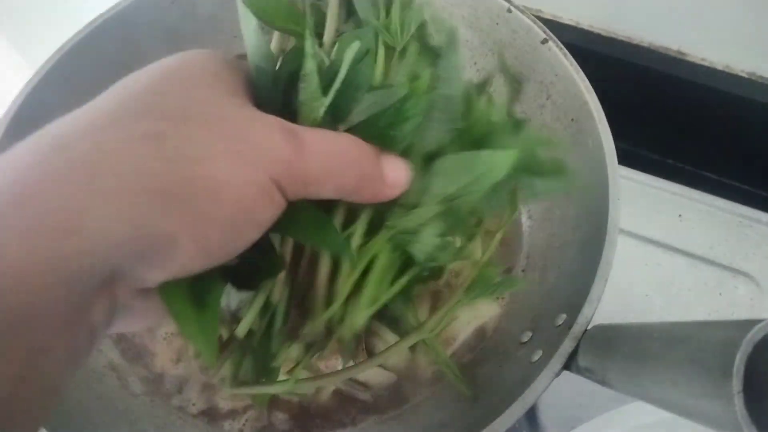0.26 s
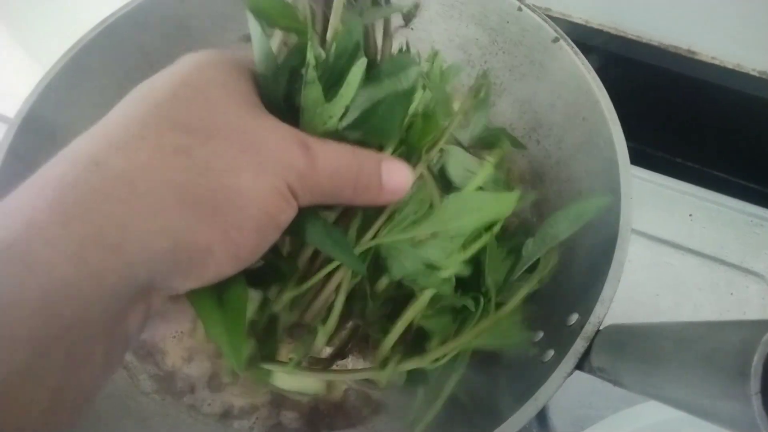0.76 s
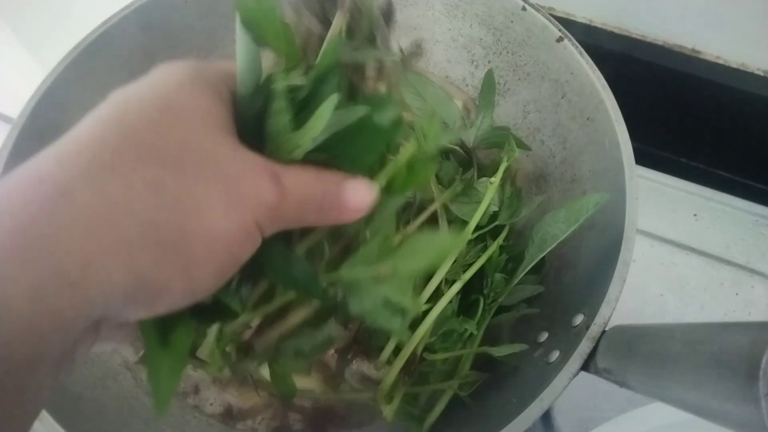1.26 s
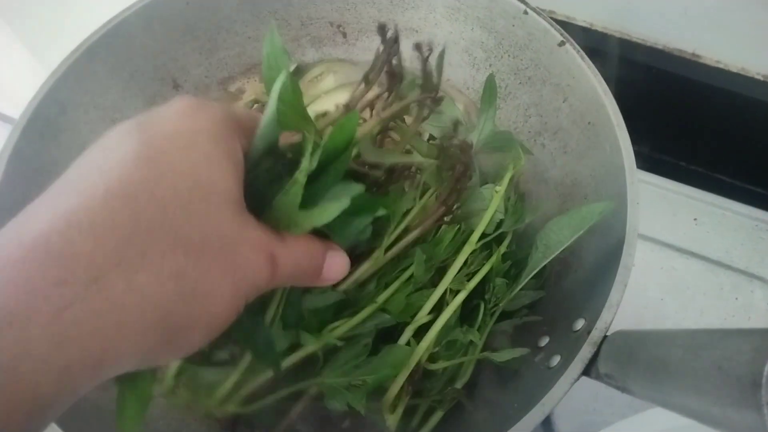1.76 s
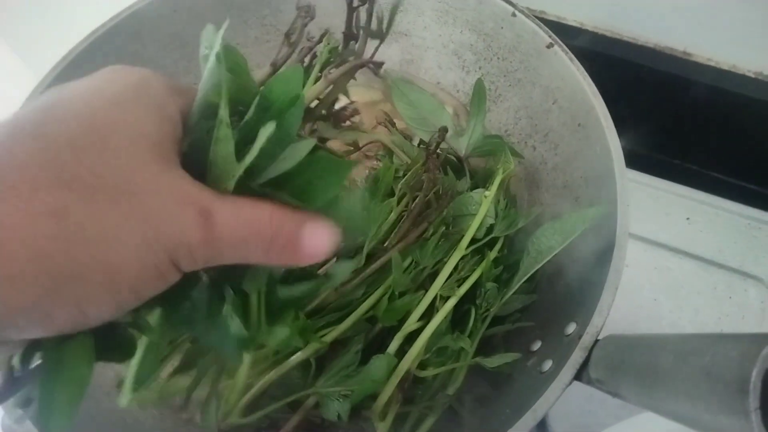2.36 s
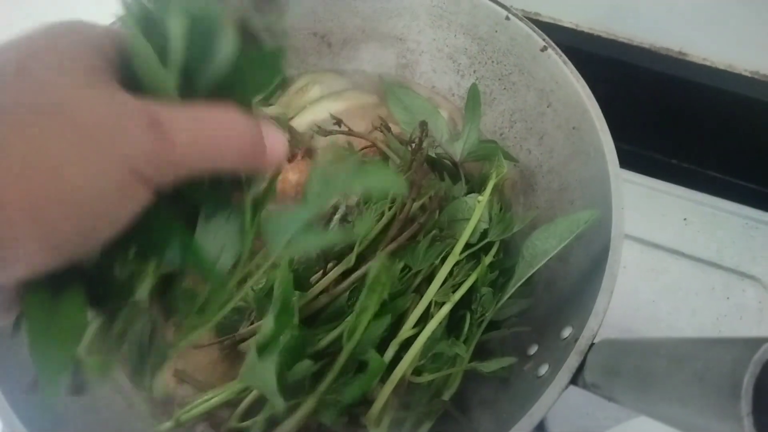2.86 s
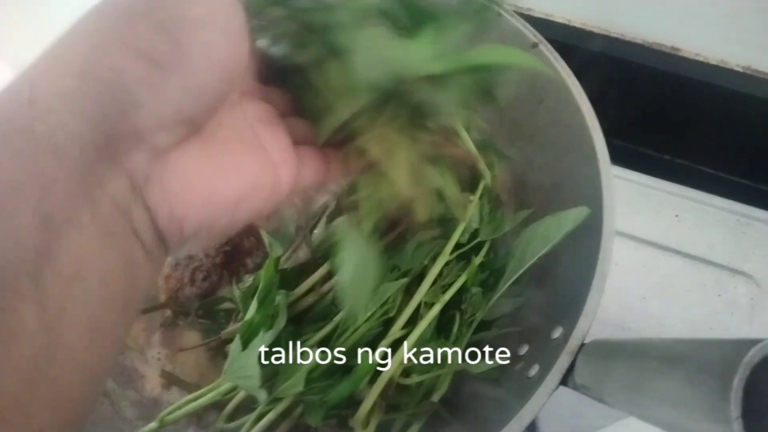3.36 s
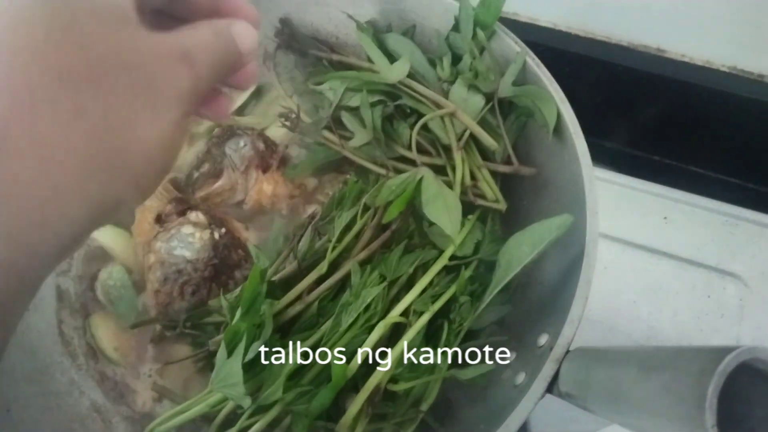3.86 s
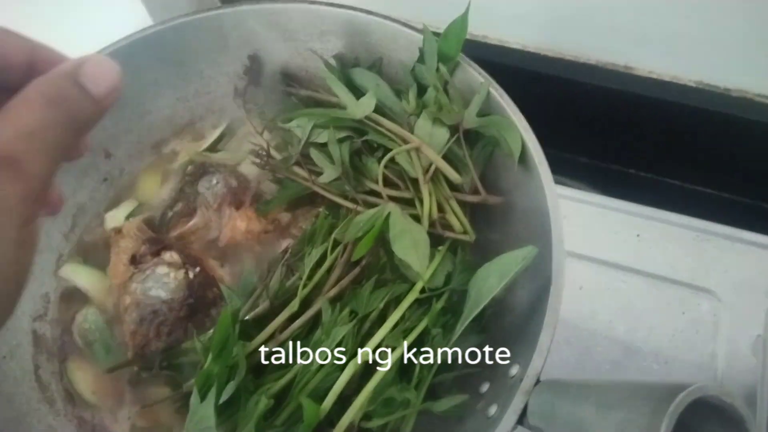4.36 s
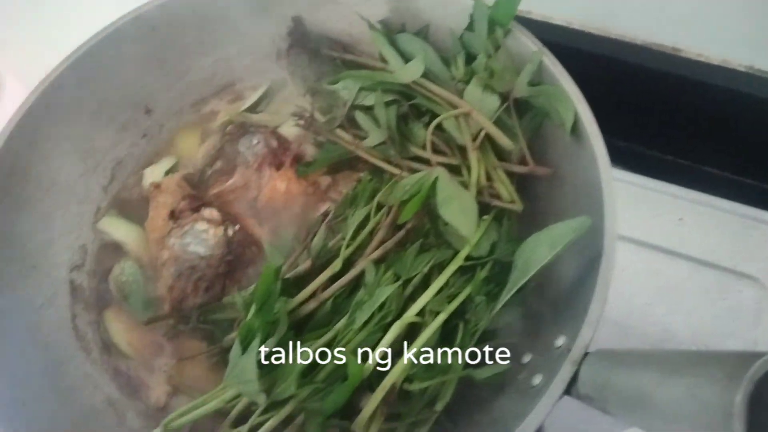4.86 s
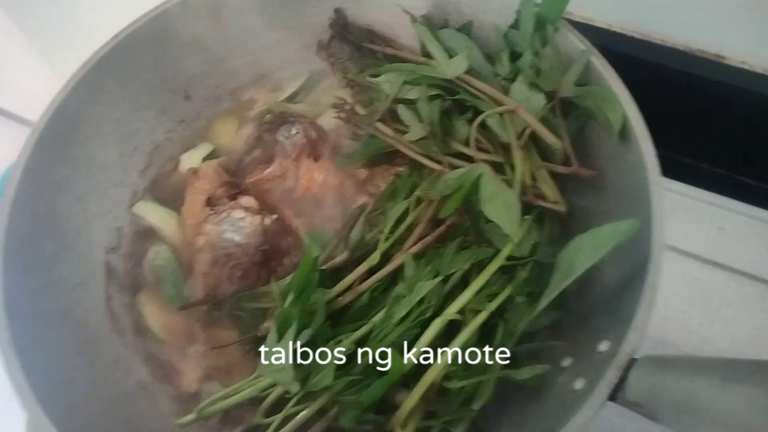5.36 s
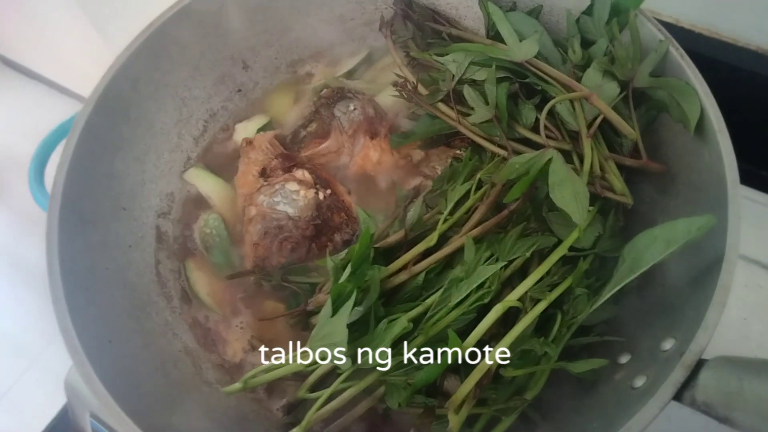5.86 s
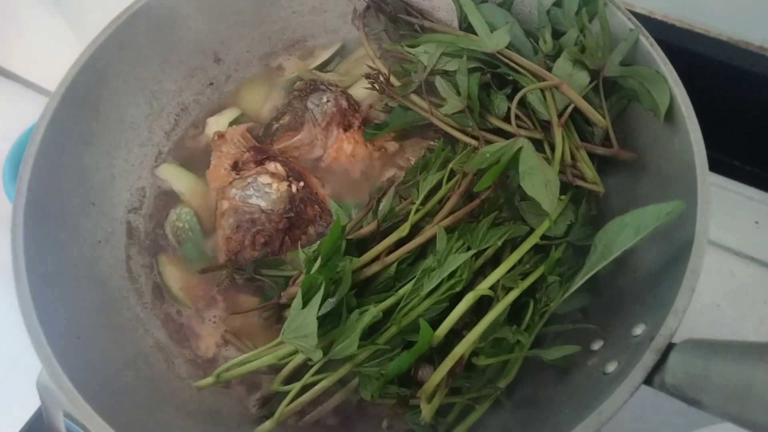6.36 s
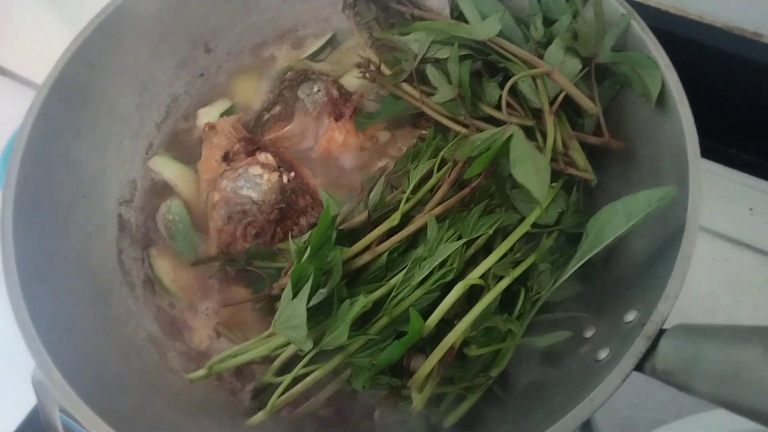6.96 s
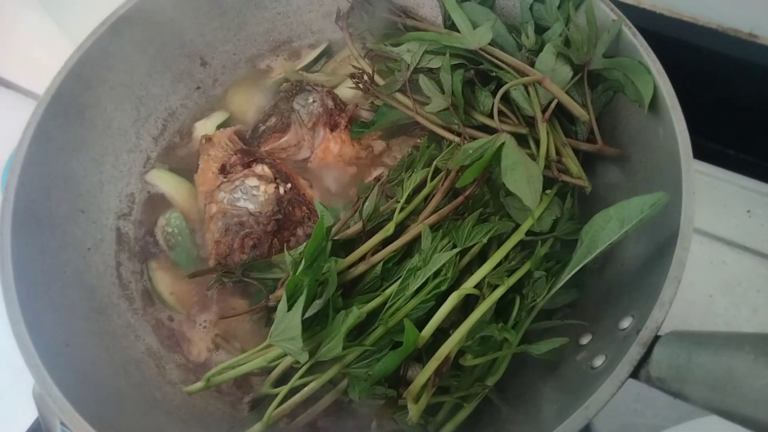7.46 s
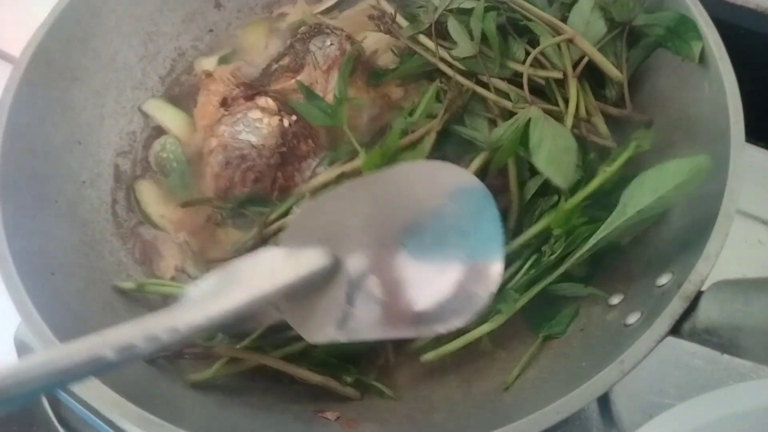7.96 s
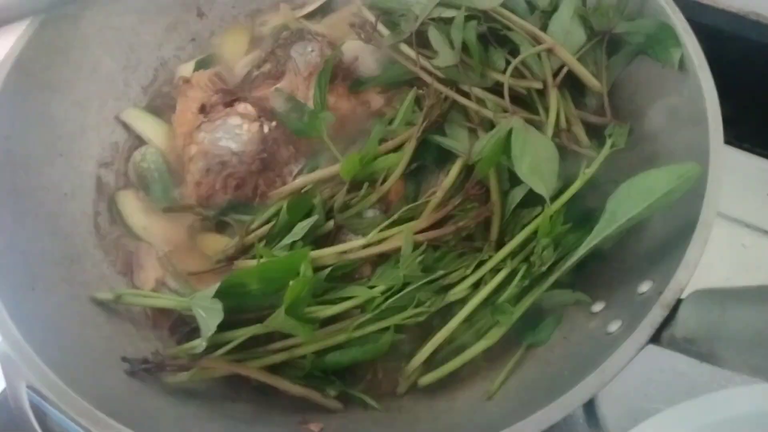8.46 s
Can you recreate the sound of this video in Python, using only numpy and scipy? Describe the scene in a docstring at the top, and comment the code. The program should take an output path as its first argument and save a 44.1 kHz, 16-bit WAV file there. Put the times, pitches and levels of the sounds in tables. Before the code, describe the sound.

From 0 s a vigorous broth boil is already running in a metal wok, close and fairly dry, with short bowl reflections and a little small-kitchen reverberation. Irregular hollow plops rise in pitch, some bright and ringing, over dense small bubbling, fine crackling fizz, a soft metallic hum and a quiet low rumble. Dry ticks and brief spits of drops on hot metal punctuate it. Around 2.6 to 2.9 s the boil eases slightly; near 3.3 s greens settle with a short rustle and airy hiss. Very faint steam whistles follow at 3.4 and 4 s. Spitting becomes busier from 4.5 s, strongest near 5.3 and 6.2 s, with faint dull bumps from 6.2 to 6.9 s. From about 6.9 s a narrow, high sizzle swells until everything stops abruptly at 7.34 s. Total silence lasts until 7.87 s, then bubbling resumes suddenly, with a soft low thud at 8.3 s, ending mid-boil around 8.7 s.

```python
"""Big bubbles pop at once, over a bed of small ones and a fine fizz: broth boils in a metal wok over a gas flame.
Bubbles are decaying sines of rising pitch; fizz, spits, sizzle and leaves are shaped clicks or noise bursts.
Drops spit on the hot wall, leafy greens are laid in, and resonators make the wok hum along with the boil.
A sizzle swells, the sound breaks off for half a second, and the boil goes on as a spatula presses the greens."""
import sys
import numpy as np
from scipy import signal
from scipy.fft import rfft, irfft
from scipy.io import wavfile

SR = 44100
rng = np.random.default_rng(int(sys.argv[2]) if len(sys.argv) > 2 else 0)


def to_wav(s):
    """Save 16-bit WAV."""
    ch = np.atleast_2d(s).T  # columns
    pcm = np.round(np.clip(ch, -1, 1) * 32767)  # PCM
    wavfile.write(sys.argv[1], SR, pcm.astype(np.int16))


N = 384111
TIME = np.arange(N) / SR

# All levels are relative: each layer's gain and the microphone response come on top.
# biggest bubbles bursting: start_s, level_db, pitch_hz (at onset), decay_cycles (to fade by 60 dB)
BIG_BUBBLES = [(0.008, -34, 1070, 8), (0.0366, -24, 1090, 5), (0.0439, -25.5, 2090, 7),
               (0.0992, -26, 1533, 16.5), (0.118, -31, 1440, 11), (0.182, -28, 1440, 31),
               (0.249, -32, 1260, 7), (0.2607, -22, 1326, 4), (0.2626, -26, 1280, 1), (0.272, -26, 1380, 8),
               (0.2815, -24, 1620, 7), (0.2907, -24.5, 1633, 26), (0.2928, -27, 1140, 3.5),
               (0.3228, -28, 1700, 5), (0.371, -30, 1860, 8), (0.38, -34, 1110, 7),
               (0.4551, -27.5, 1220, 3), (0.472, -31.5, 1290, 14), (0.6319, -31.5, 900, 7),
               (0.652, -32, 865, 19), (0.677, -36, 1300, 7), (0.7449, -29, 856, 13.5),
               (0.777, -33, 1180, 8), (0.804, -34, 890, 8), (0.8253, -22.5, 1480, 13),
               (0.8725, -28.5, 779, 12), (0.901, -29, 1530, 7), (0.9167, -26, 2830, 26.5),
               (0.9405, -30, 1130, 15), (0.9751, -31, 1180, 7), (1.002, -25, 1560, 18),
               (1.0414, -25, 2600, 7), (1.0655, -35, 933, 31), (1.0838, -26, 1335, 4),
               (1.094, -32, 2935, 28), (1.104, -35, 1320, 7), (1.1452, -30, 1010, 5),
               (1.1524, -35, 898, 12), (1.1647, -28, 2820, 25), (1.17, -33, 1040, 10),
               (1.2043, -32.5, 970, 7), (1.2155, -28, 743, 5), (1.235, -30.5, 1560, 14),
               (1.28, -32, 900, 8), (1.3062, -26, 1557, 15), (1.376, -32.5, 920, 5), (1.414, -32, 1180, 8),
               (1.424, -27.5, 1327, 4), (1.442, -34, 1530, 8), (1.508, -31.5, 1220, 8),
               (1.659, -32, 1620, 8), (1.711, -34, 1050, 6), (1.738, -33, 1290, 7), (1.762, -32.5, 880, 16),
               (1.7705, -32.5, 827, 22), (1.8182, -24.5, 1872, 31), (1.8189, -29.5, 2320, 6.5),
               (1.8185, -19, 2530, 4.5), (1.8433, -23.5, 1900, 6.5), (1.8447, -23, 2056, 6),
               (1.8511, -23.5, 2813, 20), (1.892, -33, 850, 7), (1.911, -27.5, 1380, 5),
               (1.9849, -29.5, 884, 9), (1.9985, -30.5, 1285, 6), (2.0198, -26, 1242, 2),
               (2.058, -30, 1780, 12), (2.148, -34, 1530, 2), (2.191, -32, 1000, 5),
               (2.1976, -29.5, 1125, 5), (2.2178, -31.5, 1450, 6), (2.2609, -30, 2500, 9),
               (2.3039, -26.5, 1087, 17), (2.3192, -29, 1400, 4), (2.323, -24, 1317, 6),
               (2.4871, -29, 900, 11), (2.496, -33, 980, 4), (2.6076, -32, 860, 12), (2.797, -32, 1700, 5),
               (2.8279, -25, 1500, 13), (2.8405, -28, 1590, 14), (2.881, -33, 1200, 6),
               (2.9535, -23, 1052, 10), (3.0062, -27, 1560, 5), (3.0607, -26, 2690, 15),
               (3.0675, -20, 3800, 14.5), (3.107, -32, 940, 7), (3.134, -32, 1250, 7),
               (3.15, -27.5, 1313, 7.5), (3.1919, -22, 1560, 3.5), (3.2282, -25, 2800, 19),
               (3.2483, -25, 970, 3.5), (3.2652, -24.5, 1090, 8.5), (3.2676, -23.5, 2710, 16),
               (3.2741, -25, 2614, 28), (3.3338, -30.5, 821, 11), (3.373, -32, 1000, 3),
               (3.384, -34.5, 770, 9), (3.446, -33, 1260, 7.5), (3.502, -34, 940, 7),
               (3.6139, -23.5, 1763, 23), (3.6234, -21, 3280, 6.5), (3.702, -32.5, 1520, 7),
               (3.751, -30.5, 1340, 8), (3.7661, -24, 2585, 26), (3.769, -29, 2630, 25.5),
               (3.8911, -17, 1433, 3.5), (3.8938, -30.5, 1620, 1.5), (3.8987, -26.5, 3000, 20),
               (3.9072, -28, 1450, 6), (3.925, -32, 990, 8), (4.0096, -28.5, 1502, 20),
               (4.0426, -33.5, 706, 15.5), (4.058, -34, 920, 3), (4.0921, -27.5, 903, 13),
               (4.22, -31.5, 1300, 11), (4.3452, -28, 1970, 20), (4.385, -31, 880, 8),
               (4.4355, -29, 1050, 5), (4.4529, -25, 2390, 6), (4.4565, -25, 1555, 1), (4.516, -31, 950, 8),
               (4.5293, -26.5, 1015, 3.5), (4.5501, -27.5, 1330, 5.5), (4.5815, -26.5, 3290, 8),
               (4.6549, -38, 803, 24.5), (4.6571, -25.5, 3410, 3), (4.6647, -31, 832, 12),
               (4.69, -23.5, 2710, 17.5), (4.7726, -18, 2815, 16), (4.7735, -28, 734, 5),
               (4.8858, -17, 2660, 5), (4.9337, -26, 2700, 18), (4.9557, -25.5, 1230, 9),
               (4.9782, -31, 900, 23), (5.013, -25.5, 2220, 7.5), (5.069, -31, 770, 7),
               (5.082, -30, 1100, 5), (5.0939, -27.5, 2630, 29), (5.2649, -30.5, 830, 9),
               (5.2745, -27.5, 3420, 0.5), (5.276, -23, 3260, 3.5), (5.2829, -22, 1310, 4.5),
               (5.2965, -29.5, 1160, 6), (5.371, -31, 1050, 9), (5.395, -30.5, 1140, 7),
               (5.4214, -27, 964, 12), (5.4606, -23, 2500, 3.5), (5.5211, -27.5, 780, 7.5),
               (5.5676, -27.5, 2930, 17), (5.638, -31, 1510, 8), (5.652, -33, 1410, 7),
               (5.697, -22.5, 975, 4), (5.7152, -25.5, 1590, 7), (5.7156, -27.5, 2700, 24),
               (5.725, -31, 1840, 10), (5.7494, -26, 2210, 4), (5.7724, -23, 2710, 16),
               (5.779, -19.5, 1334, 2.5), (5.817, -34, 1010, 7), (5.8332, -28, 1132, 27),
               (5.9364, -34, 2040, 27), (5.943, -32, 1900, 10), (5.9702, -24, 898, 7),
               (6.028, -32, 1070, 7), (6.042, -29.5, 1740, 10.5), (6.085, -32.5, 1150, 7),
               (6.1, -26, 940, 0.5), (6.1054, -29.5, 970, 3.5), (6.1219, -28.5, 1094, 10),
               (6.2011, -25.5, 2680, 12), (6.2099, -24.5, 970, 2), (6.2361, -24.5, 2800, 21),
               (6.2432, -27, 900, 5), (6.271, -27, 1280, 4.5), (6.3206, -23, 900, 8),
               (6.324, -22.5, 1607, 28), (6.3553, -25, 1330, 5), (6.3712, -22.5, 1675, 10),
               (6.4179, -30.5, 899, 10), (6.4959, -30.5, 895, 13), (6.5181, -22.5, 1500, 5),
               (6.5241, -27, 1740, 18), (6.57, -24, 1450, 1.5), (6.589, -24, 968, 4.5),
               (6.6577, -30.5, 977, 9), (6.689, -32, 1190, 9), (6.704, -32, 1250, 7),
               (6.714, -34, 1190, 11), (6.7721, -30.5, 1056, 5.5), (6.8318, -24.5, 1125, 6.5),
               (6.8533, -26, 1170, 5), (6.8683, -23.5, 1500, 4), (6.8751, -28, 2710, 26),
               (6.9007, -26.5, 1046, 4.5), (6.905, -25, 1096, 4.5), (6.913, -29, 1400, 9),
               (6.9334, -24.5, 1136, 5.5), (7.0106, -20.5, 936, 10), (7.0254, -29.5, 1807, 27),
               (7.0738, -24, 1323, 9.5), (7.091, -32, 1540, 7), (7.1059, -23, 1200, 6),
               (7.1937, -28.5, 1050, 3.5), (7.2123, -25.5, 1380, 9), (7.225, -29.5, 1680, 9),
               (7.2466, -23, 2802, 17.5), (7.25, -27.5, 2800, 28.5), (7.278, -27.5, 1390, 8),
               (7.3137, -29, 1180, 13), (7.883, -25.5, 790, 3), (7.8887, -21.5, 1063, 4),
               (7.932, -31, 960, 8), (7.9572, -30.5, 920, 21), (7.9627, -34, 860, 17.5),
               (7.988, -27, 1500, 3.5), (8.0227, -29, 1230, 4), (8.0586, -24, 1660, 6),
               (8.0616, -22, 1546, 1), (8.0631, -18, 1553, 17), (8.076, -31, 1550, 11),
               (8.1285, -25, 1323, 16), (8.1458, -27, 1230, 11.5), (8.1626, -29.5, 1273, 7.5),
               (8.2026, -27, 933, 5), (8.301, -31, 900, 12), (8.3504, -27.5, 1614, 7), (8.392, -32, 810, 9),
               (8.401, -35, 1150, 4), (8.442, -24.5, 2150, 12), (8.542, -30, 1740, 10), (8.62, -34, 960, 5)]
# vigour of the boil: time_s, level_db
BOIL_VIGOUR = [(0.0, -40), (0.43, -42.5), (1.03, -41), (1.5, -42.5), (2.43, -41.5), (2.59, -44),
               (2.83, -45), (3.22, -42), (3.68, -43.5), (4.37, -42), (5.97, -42), (7.1, -41.5), (8.0, -42),
               (8.042, -42), (8.7, -42.5)]
# spectrum of the fizz: frequency_hz, level_db
FIZZ_SPECTRUM = [(300, -18), (520, -5), (650, 5), (950, 1), (1600, 2), (2300, 1), (2900, 1), (4500, 3),
                 (6500, -2.5), (9000, -5), (15000, -5)]
# sharp, dry ticks among the stems and the broth: start_s, level_db
STEM_TICKS = [(0.019, -23), (0.322, -38), (0.397, -21.5), (0.901, -27), (0.976, -30), (1.0414, -24),
              (1.205, -24), (1.821, -28), (1.8517, -26), (2.02, -27), (2.148, -26), (2.2602, -22),
              (3.005, -20.5), (3.0605, -22), (3.118, -24), (3.15, -31.5), (3.192, -23), (3.228, -31.5),
              (3.249, -31), (3.276, -31), (3.333, -29.5), (5.772, -22), (6.199, -23.5), (6.869, -23),
              (7.986, -26.5), (8.022, -37), (8.06, -28), (8.351, -38), (8.442, -25)]
# drops spitting on hot metal: start_s, sputter_db, spray_db
SPITTING_DROPS = [(0.183, -23, -47.5), (0.538, -25.5, -48), (0.602, -31, -50), (0.659, -45, -30),
                  (0.859, -29, -48), (1.092, -20.5, -34), (1.194, -28, -45), (1.849, -39.5, -39.5),
                  (2.261, -22.5, -28), (2.936, -32.5, -31.5), (3.006, -30, -48), (3.067, -22.5, -45),
                  (3.294, -24, -36.5), (3.336, -28.5, -45), (3.622, -32.5, -44), (3.767, -28, -47.5),
                  (3.865, -27, -37.5), (4.09, -25.5, -47.5), (4.261, -26.5, -43), (4.332, -26.5, -48),
                  (4.455, -28.5, -41), (4.555, -25, -27.5), (4.581, -25.5, -48), (4.655, -21.5, -40),
                  (4.884, -29, -47.5), (5.02, -33, -48), (5.057, -24.5, -33), (5.273, -17.5, -28.5),
                  (5.565, -26, -37.5), (5.629, -37, -32), (5.773, -22, -29.5), (5.935, -24.5, -36),
                  (6.0, -48, -37), (6.098, -23.5, -38), (6.234, -17.5, -21.5), (6.397, -41, -35),
                  (6.439, -22.5, -34.5), (6.584, -26, -41.5), (6.645, -24.5, -40), (6.906, -24.5, -38.5),
                  (6.941, -45, -31), (6.977, -41, -32), (7.274, -19.5, -31.5), (8.237, -27, -49),
                  (8.441, -34, -48), (8.534, -49, -43), (8.652, -28, -34.5), (8.673, -23, -29.5)]
# thin whistles of steam under the leaves: start_s, length_s, first_hz, last_hz, level_db
STEAM_WHISTLES = [(3.39, .09, 3700, 3700, -45.5), (3.93, 0.1, 4020, 3950, -45),
                  (4.009, 0.043, 4080, 3830, -42.5), (4.0, 0.16, 4040, 4010, -49)]
# broth searing on the hot wall: time_s, level_db
SEAR_LEVEL = [(6.8, -64), (6.95, -48), (7.1, -44.5), (7.2, -42), (7.26, -37), (7.34, -37), (7.6, -97)]
# spectrum of the sear: frequency_hz, level_db
SIZZLE_SPECTRUM = [(1500, -30.5), (3500, -11.5), (4000, 6), (4300, 2.5), (4800, 4.5), (5200, 4.5),
                   (5500, 13), (5750, 4), (6100, -14), (9000, -24), (15000, -21.5)]
# resonances of the filled wok: pitch_hz, width_hz, level_db
WOK_MODES = [(240.8, 35, 2.5), (403.6, 24.3, 4), (573.7, 64.7, 0.5), (747.6, 23, 5), (875, 55, 1.5),
             (1004, 44, -2), (1606, 70, -14.5), (2980, 350, -11), (4170, 250, -12), (5500, 4.6, -4),
             (11060, 130, 0), (12040, 120, 0.5), (12950, 100, 2)]
# dull bumps against the wok: start_s, level_db
WOK_BUMPS = [(6.249, -41), (6.576, -41), (6.591, -38), (6.607, -40), (6.647, -41), (6.658, -40),
             (6.676, -39), (6.696, -44), (6.711, -43), (6.774, -45), (6.823, -46), (6.868, -43),
             (6.901, -42), (6.931, -42), (8.304, -36), (8.315, -41), (8.394, -49), (8.44, -44),
             (8.553, -51), (8.623, -43), (8.639, -42)]
# low modes of the bumped wok: pitch_hz, level_db, t60_s
BUMP_MODES = [(140, -6, .07), (255, -4, .07), (399, -3, .11), (570, -8, .05), (745, -4, .09)]
# low glugs of steam from deep in the broth: start_s, level_db, pitch_hz (at onset)
STEAM_GLUGS = [(2.146, -41, 218), (2.189, -42, 219), (3.649, -37, 263), (4.378, -39, 215),
               (6.765, -45, 120), (7.206, -40, 104.4), (8.303, -31.5, 350.6), (8.611, -46, 95),
               (8.625, -43, 253)]
# spectrum of the steady rumble: frequency_hz, level_db
RUMBLE_SPECTRUM = [(25, -20), (70, -16.5), (100, -8.5), (120, 0.5), (170, 2), (265, 2), (310, -7),
                   (400, -1), (500, -6.5), (900, -12), (3000, -54)]
# microphone response above the bowl: frequency_hz, level_db
MIC_RESPONSE = [(25, -11), (75, -6.5), (130, -1.5), (410, 3.5), (490, 0.5), (600, 2.5), (800, 0.5),
                (1200, 2), (3000, 2), (3650, -3), (4500, 1), (5500, -4), (6300, -11), (7200, -22),
                (8300, -27.5), (10000, -21.5), (11500, -15.5), (13000, -21), (15500, -32)]
# silent gap: start_s, end_s
SILENT_GAP = (7.339, 7.8655)

SURGE_DB, SURGES_PER_S = 0.44, 35    # the boil comes in short random surges
RUMBLE_DB = -56                      # steady rumble beneath the boil
LEAVES_S = 3.32                      # the greens rustle loudest here
CUTOFF_HZ = 15600                    # top of the recorded band


def from_db(db):
    """Level: an amplitude gain is ten to the power of decibels over twenty."""
    return 10 ** (np.asarray(db) / 20)


def rms_one(x):
    """Normalisation: scale to a root-mean-square value of 1."""
    return x / np.sqrt(np.mean(x ** 2) + 1e-20)


def in_time(rows):
    """Linear interpolation: each column of a curve at every sample."""
    time_s, *columns = np.transpose(rows)
    return [np.interp(TIME, time_s, column) for column in columns]


def add(out, start_s, sound):
    """Superposition: mix a sound in from its start time on."""
    i = int(np.clip(start_s * SR, 0, N - 1))
    out[i:i + len(sound)] += sound[:N - i]


def drift(rate):
    """Random modulation: straight lines join `rate` normal values per second, each of spread 1."""
    knots = rng.standard_normal(4000)
    return np.interp(TIME * rate, np.arange(len(knots)), knots)


def band(x, low_hz, high_hz):
    """Band-pass filtering: keep the band between two frequencies."""
    sections = signal.butter(2, [low_hz, high_hz], "band", fs=SR, output="sos")
    return signal.sosfilt(sections, x + 1e-18)


def colour(x, spectrum, size=4096):
    """Minimum-phase filtering: a folded cepstrum gives a causal response that follows a spectrum."""
    hz, db = np.transpose(spectrum)
    grid_hz = np.maximum(np.fft.rfftfreq(size, 1 / SR), 1)
    gain = from_db(np.interp(np.log(grid_hz), np.log(hz), db))
    cepstrum = irfft(np.log(gain))
    cepstrum[1:size // 2] *= 2
    cepstrum[size // 2 + 1:] = 0
    response = irfft(np.exp(rfft(cepstrum)))
    return signal.oaconvolve(x, response)[:N]


def grains(per_s, spread_db):
    """Shot noise: random clicks of uneven size and sign."""
    sizes = from_db(spread_db * np.minimum(rng.exponential(1, N), 4))
    signs = rng.choice([-1, 1], N)
    return sizes * signs * (rng.random(N) < per_s / SR)


def noise_burst(length_s, fade_s):
    """Exponential decay: white noise that falls by a factor e in each fade time."""
    t = np.arange(int(length_s * SR)) / SR
    return rng.standard_normal(len(t)) * np.exp(-t / fade_s)


def bubble(hz, cycles, rise=0.1076, swell=0.452):
    """Damped resonance: an opening bubble rings up, climbs in pitch and dies; its envelope peaks at 1."""
    turn = np.arange(int(SR * cycles / hz) + 2) * hz / SR    # elapsed cycles of the onset pitch
    shape = (1 - np.exp(-(turn / swell) ** 2)) * from_db(-60 * turn / cycles)
    phase = 2 * np.pi * turn * (1 + rise * turn / cycles)
    return shape / shape.max() * np.sin(phase)


def big_pops(level_db, snap_db, snap_s, daughter_db, wait_s, daughter_octaves, daughter_rise, count=4):
    """Film rupture: each big bubble snaps open and rings, then folds into weaker, smaller daughter bubbles."""
    out, snaps = np.zeros(N), np.zeros(N)
    for s, db, hz, cycles in BIG_BUBBLES:
        parent = bubble(hz, cycles, rise=0.363, swell=0.852)
        add(out, s, from_db(db + level_db) * parent * rng.choice([-1, 1]))
        # the snap comes one cycle into the ring
        add(snaps, s + 1 / hz, from_db(db + snap_db) * noise_burst(0.01, snap_s))
        for wait, pitch in rng.random((count, 2)):
            daughter_hz = hz * daughter_rise * 2 ** (daughter_octaves * (2 * pitch - 1))
            daughter = bubble(daughter_hz, cycles=9.7) * rng.choice([-1, 1])
            gain = from_db(db + daughter_db) * (1 - wait / 2)    # later ones are weaker
            add(out, s + (wait + 0.147) * wait_s, gain * daughter)
    return out + band(snaps, low_hz=696, high_hz=4800)


def small_pops(per_s, lowest_hz, octaves, spread_db, cycles, cluster_s, count=3):
    """Clustered resonances: small bubbles burst in little groups of mixed pitch and damping; rms 1."""
    out = np.zeros(N)
    clusters = int(per_s * N / SR / count)
    for when, *members in rng.random((1500, 1 + 4 * count))[:clusters]:
        for wait, size, pitch, damping in np.reshape(members, (count, -1)):
            hz = lowest_hz * 2 ** (octaves * pitch ** 1.2)    # most are low
            gain = from_db(-spread_db * np.log(size + 0.063))
            pop = bubble(hz, cycles * 2 ** (2 * damping - 1))
            add(out, when * N / SR + wait * cluster_s, gain * pop)
    return rms_one(out)


def fizz(per_s, spread_db, flutter_db):
    """Modulated shot noise: tiny bubbles crackle in flurries; rms 1."""
    flurry = from_db(flutter_db * drift(70))
    return rms_one(colour(grains(per_s, spread_db) * flurry, FIZZ_SPECTRUM))


def flurries(per_s, centre_hz, octaves, width, fade_s, spread_db):
    """Narrow-band noise: patches of foam collapse, each a brief fizz at a pitch of its own; rms 1."""
    out, t = np.zeros(N), np.arange(SR // 12) / SR
    swell = t / fade_s * np.exp(-t / fade_s)
    for when, pitch, size in rng.random((600, 3))[:int(per_s * N / SR)]:
        hz = centre_hz * 2 ** (octaves * (pitch - .5))
        patch = band(rng.standard_normal(len(t)) * swell, hz / (1 + width), hz * (1 + width))
        add(out, when * N / SR, from_db(spread_db * size) * patch)
    return rms_one(out)


def ticks(level_db, hz, cycles):
    """Heavy damping: a tiny snap is over within a few cycles."""
    out = np.zeros(N)
    for s, db in STEM_TICKS:
        add(out, s, from_db(db + level_db) * bubble(hz, cycles))
    return out


def spits(sputter_db, spray_db, fade_s, spray_fade_s):
    """Flash boiling: a drop turns to steam in a sputter of a few milliseconds and a higher spray."""
    sputter, spray = np.zeros(N), np.zeros(N)
    for s, coarse_db, fine_db in SPITTING_DROPS:
        add(sputter, s, from_db(coarse_db + sputter_db) * noise_burst(0.05, fade_s))
        add(spray, s, from_db(fine_db + spray_db) * noise_burst(0.05, spray_fade_s))
    return band(sputter, low_hz=3574, high_hz=6028) + band(spray, low_hz=7800, high_hz=11300)


def whistles(waver_hz, flutter_db):
    """Jet tone: steam squeezing out under a wet leaf gives a sputtering note, level or falling."""
    out = np.zeros(N)
    for s, length_s, first_hz, last_hz, db in STEAM_WHISTLES:
        n = int(length_s * SR)
        hz = np.linspace(first_hz, last_hz, n) + waver_hz * drift(400)[:n]
        level = from_db(db + flutter_db * drift(180)[:n]) * np.hanning(n)
        add(out, s, level * np.sin(2 * np.pi * np.cumsum(hz) / SR))
    return out


def leaves(s, width_s, level_db):
    """Friction noise: the last handful of greens rustles down, with an airy hiss as it meets the heat."""
    rustle = rms_one(band(grains(per_s=1700, spread_db=4.5), low_hz=827, high_hz=4205))
    air = rms_one(band(grains(per_s=11000, spread_db=-2.5), low_hz=4800, high_hz=16000))
    rustle_swell = np.exp(-((TIME - s) / (1.41 * width_s)) ** 2)    # the stems touch first and settle last
    air_swell = np.exp(-((TIME - s) / width_s) ** 2)
    return from_db(level_db) * (rustle_swell * rustle + from_db(4.5) * air_swell * air)


def sizzle(per_s, spread_db, flutter_db, flutters_per_s):
    """Modulated shot noise: broth on the hot wall boils off in rapid, uneven spurts; rms 1."""
    spurts = from_db(flutter_db * drift(flutters_per_s))
    return rms_one(colour(grains(per_s, spread_db) * spurts, SIZZLE_SPECTRUM))


def wok(x):
    """Forced resonance: the bowl's modes, damped by the broth, ring along with what drives them."""
    out = np.zeros(N)
    for hz, width_hz, db in WOK_MODES:
        r = np.exp(-np.pi * width_hz / SR)    # pole radius sets the damping
        zeros = [(1 - r * r) / 2, 0, (r * r - 1) / 2]
        poles = [1, -2 * r * np.cos(2 * np.pi * hz / SR), r * r]
        out += from_db(db) * signal.lfilter(zeros, poles, x)
    return out


def bumps(level_db, thud_db, fade_s):
    """Impact excitation: a soft contact gives a short, dull thud and rings the bowl's low modes."""
    push, rings, t = np.zeros(N), np.zeros(N), np.arange(SR // 4) / SR
    note = np.zeros(len(t))
    for hz, db, t60_s in BUMP_MODES:
        note += from_db(db - 60 * t / t60_s) * np.sin(2 * np.pi * hz * t)
    for s, db in WOK_BUMPS:
        add(push, s, from_db(db + thud_db) * noise_burst(0.25, fade_s))
        add(rings, s, from_db(db + level_db) * note)
    return band(push + rings, low_hz=125, high_hz=780)


def glugs(level_db, cycles, ring_db):
    """Large-bubble resonance: a pocket of steam heaves for a few cycles and nudges the bowl."""
    out = np.zeros(N)
    for s, db, hz in STEAM_GLUGS:
        add(out, s, from_db(db + level_db) * bubble(hz, cycles, rise=0.224, swell=0.72))
    return out + from_db(ring_db) * wok(out)


def echoes(x, delay_s, t60, moves_per_s, count=3):
    """Reverberation: dense reflections start after a delay and die away; their mix shifts at random."""
    t = np.arange(SR // 3) / SR
    shares = np.array([drift(moves_per_s) for _ in range(count)])
    out = np.zeros(N)
    for share in shares / np.linalg.norm(shares, axis=0):
        tail = rng.standard_normal(len(t)) * from_db(-60 * t / t60) * (t > delay_s)
        out += signal.oaconvolve(x * share, tail / np.linalg.norm(tail))[:N]
    return out


def hum():
    """Forced resonance: bubbles collapsing on the metal itself keep the bowl humming."""
    return from_db(RUMBLE_DB + 14.0) * wok(rms_one(grains(per_s=1500, spread_db=4.0)))


def rumble():
    """Filtered shot noise: a steady low rumble lies beneath the boil."""
    return from_db(RUMBLE_DB) * rms_one(colour(grains(per_s=900, spread_db=5.5), RUMBLE_SPECTRUM))


def scene():
    """Superposition: the boil in its bowl, the kitchen around it and the flame below."""
    vigour_db, = in_time(BOIL_VIGOUR)
    vigour_db = vigour_db + SURGE_DB * drift(SURGES_PER_S)
    sear_db, = in_time(SEAR_LEVEL)
    pops = big_pops(level_db=-2.0, snap_db=-5.5, snap_s=0.00083, daughter_db=-9, wait_s=.007,
                    daughter_octaves=0.599, daughter_rise=1.35)
    # the smaller the bubbles, the higher they ring
    small = from_db(vigour_db - 9.5) * small_pops(
        per_s=170, lowest_hz=770, octaves=1.4966, spread_db=2.5, cycles=13, cluster_s=.014)
    tiny = from_db(vigour_db - 11.0) * small_pops(
        per_s=250, lowest_hz=2470.0, octaves=1.2, spread_db=4.0, cycles=18, cluster_s=.02)
    finest = from_db(-54.5) * small_pops(
        per_s=48, lowest_hz=8780, octaves=.5, spread_db=7, cycles=14, cluster_s=0.039)
    crackle = from_db(vigour_db - 3.3) * fizz(per_s=4200, spread_db=2.0, flutter_db=2.5)
    mist = from_db(-49.5) * rms_one(band(grains(per_s=5000, spread_db=4.0), low_hz=8517, high_hz=15100))
    foam = from_db(vigour_db - 10.0) * flurries(
        per_s=40, centre_hz=3830, octaves=1.25, width=0.14, fade_s=0.00946, spread_db=10.5)
    boil = small + tiny + finest + crackle + mist + foam
    boil += ticks(level_db=-1.5, hz=2615, cycles=2.7)
    boil += spits(sputter_db=0.5, spray_db=2.5, fade_s=0.00504, spray_fade_s=0.0075)
    boil += whistles(waver_hz=45, flutter_db=0.5)
    boil += leaves(LEAVES_S, width_s=0.0635, level_db=-45.0)
    boil += from_db(sear_db) * sizzle(per_s=4500, spread_db=2.0, flutter_db=2.5, flutters_per_s=130)
    # bubbles at the surface shake the metal less
    ring = from_db(-1.0) * wok(boil + from_db(-2) * pops)
    boil += pops
    bowl = from_db(-11.5) * echoes(boil, delay_s=0.0012, t60=0.056, moves_per_s=14)
    kitchen = from_db(-20.0) * echoes(boil, delay_s=0.011, t60=0.18, moves_per_s=6)
    thuds = bumps(level_db=-2.5, thud_db=6.5, fade_s=0.011)
    thuds += glugs(level_db=-3.5, cycles=4.55, ring_db=-2.5)
    return (boil + bowl + kitchen + ring + hum() + rumble() + thuds)[None]


def record(dry):
    """Linear filtering and gating: microphone colour, half a second of silence and a steep top cut."""
    gap_start_s, gap_end_s = SILENT_GAP
    running = (TIME < gap_start_s) | (TIME > gap_end_s)
    sound = colour(dry[0], MIC_RESPONSE) * running
    top_cut = signal.ellip(10, .1, 80, CUTOFF_HZ, fs=SR, output="sos")
    return signal.sosfilt(top_cut, sound + 1e-18)[None]


dry = scene()
out = record(dry)
to_wav(out)
```